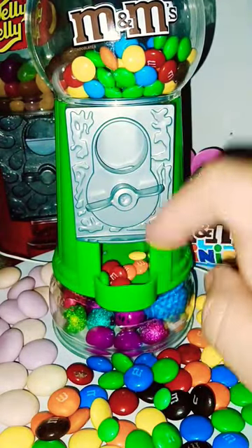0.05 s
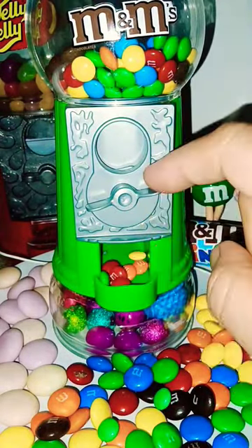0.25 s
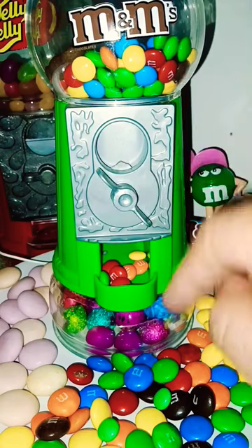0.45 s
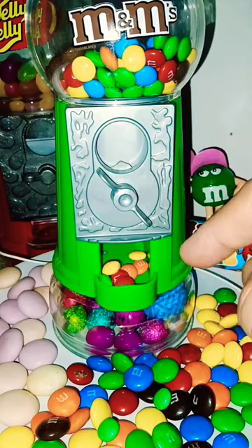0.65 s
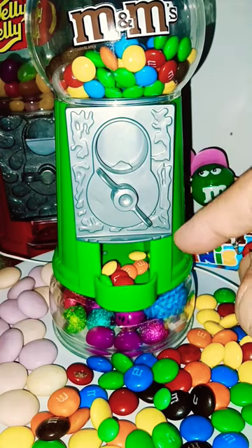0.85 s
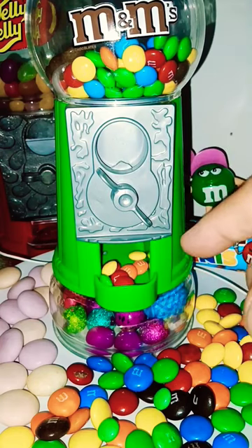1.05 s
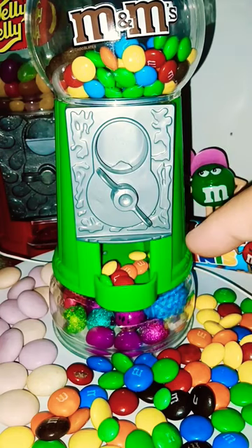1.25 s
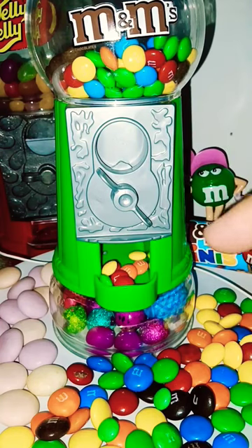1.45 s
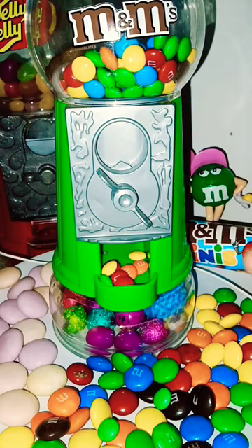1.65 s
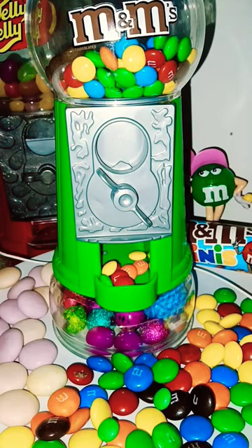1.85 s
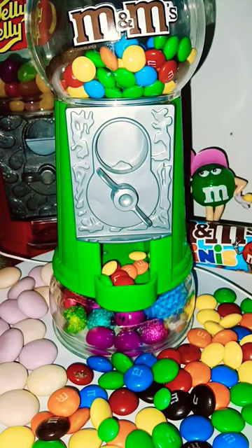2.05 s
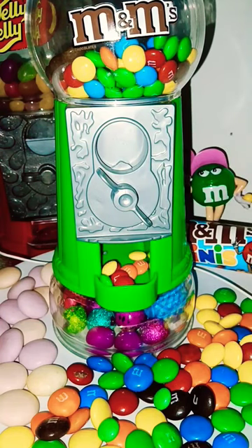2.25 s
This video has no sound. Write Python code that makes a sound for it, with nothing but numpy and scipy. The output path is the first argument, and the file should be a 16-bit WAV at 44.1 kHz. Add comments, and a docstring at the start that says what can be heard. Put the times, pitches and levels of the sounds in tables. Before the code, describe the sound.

A plastic candy dispenser's knob ratchets with sharp clicks and rattling sweets, then near quiet.

```python
"""Candy dispenser, one turn of the knob

The knob of a small plastic candy dispenser is turned close by, in a quiet room. The mechanism takes up
its slack and the pawl snaps over the ratchet, each snap a burst of chatter that rings the casing.
Sweets rattle inside, a spring rings thinly, and the body thuds and rocks under the hand.
Afterwards only mains hum, low room noise and two tiny ticks of settling sweets remain."""
import sys
import numpy as np
from scipy import signal
from scipy.fft import rfft, irfft
from scipy.io import wavfile
from scipy.ndimage import uniform_filter1d

SR = 44100
rng = np.random.default_rng(int(sys.argv[2]) if len(sys.argv) > 2 else 0)


def wrap_up_sound(samples):
    """Save the sound to the file named by the first command line argument, as 16-bit audio."""
    columns = np.atleast_2d(samples).T
    # keep every value between -1 and 1, then stretch to whole-number steps
    tamed = np.clip(columns, -1, 1)
    steps = np.round(tamed * 32767).astype(np.int16)
    wavfile.write(sys.argv[1], SR, steps)


N = 101429


def undb(db):
    """Decibels to gain."""
    return 10 ** (np.asarray(db) / 20)


def pan(db):
    """Left and right gains for a level difference, left minus right."""
    return undb(np.array([[db], [-db]]) / 2)


def add(out, at, sound):
    """Mix a stereo sound in at a time in seconds."""
    start = max(int(at * SR), 0)
    out[:, start:start + sound.shape[1]] += sound[:, :N - start]


def freqs(size=4096):
    """Frequencies of a spectrum, never quite zero."""
    return np.maximum(np.fft.rfftfreq(size, 1 / SR), 1)


def colour(hz, db, size=4096):
    """EQ curve through (Hz, dB) points on a log-frequency axis."""
    return undb(np.interp(np.log(freqs(size)), np.log(hz), db))


def response(gain):
    """Minimum-phase impulse response of an EQ curve."""
    cepstrum = irfft(np.log(gain + 1e-9))
    half = cepstrum.shape[-1] // 2
    cepstrum[..., 1:half] *= 2
    cepstrum[..., half + 1:] = 0
    return irfft(np.exp(rfft(cepstrum)))


def resonance(hz, width_hz):
    """EQ curve of one resonant peak."""
    return 1 / np.hypot(1, 2 * (freqs() - hz) / width_hz)


def lowpass(x, hz):
    """Gentle second-order treble roll-off."""
    return signal.sosfilt(signal.butter(2, hz, fs=SR, output="sos"), x)


def fade(t, t60):
    """Exponential decay by 60 dB in t60."""
    return np.exp(-np.log(1000) * t / t60)


def drift(per_s):
    """Slow random drift with a spread near 1."""
    points = rng.standard_normal(256)
    return np.interp(np.arange(N) / SR * per_s, np.arange(len(points)), points)


def chatter(ms, size=1024, passes=8):
    """One contact: a burst of micro-impacts that falls away after about ms; wide only in the treble."""
    rise_ms, mono_below_hz = .25, 2500
    age_ms = 1000 * np.arange(1, size + 1) / SR
    envelope = (1 - np.exp(-age_ms / rise_ms)) / (1 + (age_ms / ms) ** 3)
    width = 1 / np.hypot(1, (mono_below_hz / freqs(size)) ** 2)
    mid, side = rfft(rng.standard_normal((2, size)) * envelope)
    burst = irfft(mid + width * side * np.array([[1], [-1]]))
    for _ in range(passes):  # impose the envelope, then flatten the spectrum
        burst = burst * envelope / np.sqrt(uniform_filter1d(burst ** 2, size=24) + 1e-12)
        burst = irfft(np.exp(1j * np.angle(rfft(burst))))
    return burst * np.hanning(2 * size)[size:]


def mains_hum():
    """An appliance hums steadily, each partial wavering slightly in phase and level."""
    # partials of the hum: (frequency [Hz], level [dB])
    partials = [(199.2, -63), (258.4, -76), (301.5, -74), (398.4, -67.5), (500.6, -82), (597.5, -82.5),
                (699.8, -86.5), (802.1, -94.5), (899.0, -86.5)]
    waver_rad, waver_db = .15, .3
    t, hum = np.arange(N) / SR, 0
    for hz, db in partials:
        phase = 2 * np.pi * (hz * t + rng.random()) + waver_rad * drift(per_s=4)
        hum += np.sqrt(2) * undb(db + waver_db * drift(per_s=6)) * np.sin(phase)
    return hum * pan(db=1)


def room_tone():
    """A soft, wide bed of noise, heaviest in the bass."""
    # spectrum of the room noise: (frequency [Hz], relative level [dB])
    spectrum = [(10, -3.5), (30, 1.5), (60, -9.5), (105, -8), (160, -13.5), (280, -13.5), (550, -22.5),
                (1000, -25.5), (2500, -29), (6000, -34), (15000, -39)]
    hz, db = np.array(spectrum).T
    mid, side = irfft(rfft(rng.standard_normal((2, N))) * colour(hz, db, size=N), N)
    air = (mid + side * np.array([[1], [-1]])) / np.std(mid)
    return undb(-62) * air * pan(db=2.5)


def room(x):
    """Add diffuse reflections from near surfaces and the walls; the later, the duller."""
    # the table, a near wall, then the room: (delay [s], t60 [s], level [dB], pan [dB], low-pass [Hz])
    echoes = [(.003, .12, -9.5, 3.5, 12000), (.0115, .05, -13.5, -2.5, 9000), (.016, .22, -13.5, 1, 9000),
              (.025, .55, -24.5, 1, 6500)]
    t, tail = np.arange(SR) / SR, np.zeros((2, N))
    for delay, t60, db, pan_db, dull_hz in echoes:
        echo = rng.standard_normal((2, len(t))) * fade(t, t60)
        echo /= np.sqrt(np.sum(echo ** 2) / 2)
        add(tail, delay, undb(db) * pan(pan_db) * lowpass(echo, dull_hz))
    return x + signal.fftconvolve(x, tail, axes=1)[:, :N]


def rumble():
    """The dispenser rocks a little under the hand while the knob is forced round."""
    # envelope of the rocking: (time [s], level [dB])
    rocking = [(.17, -68), (.22, -53), (.28, -50.5), (.335, -58), (.375, -44), (.41, -53.5), (.47, -55)]
    times, db = np.array(rocking).T
    envelope = np.interp(np.arange(N) / SR, times, undb(db), left=0, right=0)
    noise = lowpass(rng.standard_normal(N), hz=41.4)
    return pan(db=8) * noise / np.std(noise) * envelope


def ticks():
    """Sweets settle, each with a tiny high tick."""
    # settling sweets: (time [s], level [dB])
    settles = [(1.9454, -31.5), (2.1048, -27)]
    out, ring = np.zeros((2, N)), response(resonance(hz=7500, width_hz=590))
    for at, db in settles:
        add(out, at, undb(db) * signal.fftconvolve(chatter(ms=2), ring[None], axes=1))
    return out


def thud():
    """The hardest snap jerks the whole dispenser on its base."""
    # low modes of the body: (frequency [Hz], t60 [s], level [dB])
    modes = [(45, .04, -32), (150, 0.02, -40.5), (431.2, 0.0195, -38)]
    t, out = np.arange(SR) / SR, np.zeros((2, N))
    body = sum(undb(db) * np.sin(2 * np.pi * hz * t) * fade(t, t60) for hz, t60, db in modes)
    add(out, at=.3563, sound=-pan(db=9) * body)
    return out


def spring():
    """Hard snaps jolt the return spring and linkage into a thin metallic ring."""
    # jolts of the spring: (time [s], level [dB])
    jolts = [(.2765, -9.5), (0.357, 2), (0.411, -1), (.510, -11)]
    # modes of spring and linkage: (frequency [Hz], t60 [s], level [dB], pan [dB])
    modes = [(2110, 0.24, -42, 2), (3600, 0.3, -43.5, 1), (4800, 0.16, -47.5, 3), (5425, 0.25, -40.5, 11.5),
             (5900, 0.272, -43, 12), (6255, .3, -41, 11.5), (6700, 0.2, -43, 6), (7248, .2, -41, 7),
             (7522, .25, -42.5, 10.5), (7930, .17, -33.5, 2.5), (8380, 0.12, -49, -2),
             (9616, 0.17, -40, -1)]
    t, out = np.arange(SR) / SR, np.zeros((2, N))
    attack = 1 - np.exp(-t / .0025)
    for at, jolt_db in jolts:
        for hz, t60, db, pan_db in modes:
            wave = np.sin(2 * np.pi * (hz * t + rng.random((2, 1))))
            add(out, at, undb(db + jolt_db) * pan(pan_db) * wave * fade(t, t60) * attack)
    return out


def casing(low_db, knock_db, middle_db, bright_db, air_db):
    """Stereo EQ curve of the plastic casing; where it is struck decides which modes speak."""
    # modes of the casing: (frequency [Hz], width [Hz], level [dB], pan [dB])
    modes = [(866, 1500, 0, 4.5), (1390, 215, 10, 4), (1864, 210, 13, 0.5), (2802, 540, 7, 3.5),
             (3794, 570, 11, -2), (4380, 380, 12, -1), (4690, 264, 9, 12.5), (5525, 320, 12.5, 10),
             (6202, 350, 17, 6), (7240, 410, 8.5, 18.5), (7620, 400, 13.5, 10.5), (8586, 725, 14.5, -1),
             (9516, 700, 13.5, -3.5), (10940, 700, 5.5, 0), (12340, 2100, 3.5, -0.5),
             (13360, 1100, 3, -0.5), (15000, 600, -4, -3)]
    # tone bands low, knock, middle, a 0 dB anchor, bright and air: (frequency [Hz])
    bands_hz = [800, 1900, 5400, 7600, 9600, 13000]
    skirt_slope, valley_db = 1.3, -10
    low_cut_hz, shelf_hz, shelf_db = 750, 10800, -6.5
    power = sum((undb(db) * pan(pan_db) * resonance(hz, width_hz) ** skirt_slope) ** 2
                for hz, width_hz, db, pan_db in modes)
    peaks = np.sqrt(power + undb(valley_db) ** 2)
    low_cut = 1 / np.hypot(1, (low_cut_hz / freqs()) ** 3)
    top_shelf = undb(shelf_db / (1 + (shelf_hz / freqs()) ** 20))
    tone = colour(bands_hz, [low_db, knock_db, middle_db, 0, bright_db, air_db])
    return peaks * low_cut * top_shelf * tone


def rattle():
    """Sweets and loose parts pepper the casing in short, dense flurries that die away."""
    # flurries: (start [s], length [s], release [s], level [dB], knock [dB], middle [dB], air [dB])
    flurries = [(0.193, .025, .008, -31, 7.5, -2, -6.5), (0.272, 0.002957, .002, -26, -1.5, 0, 0.5),
                (0.366, 0.066, .017, -24.5, -8.5, 0, 0.5), (0.504, .003, .002, -25.5, -4, 9, -2)]
    hits_per_s, attack_s, spread_db = 1400, .004, .5
    t, out = np.arange(N) / SR, np.zeros((2, N))
    for at, length, release, db, knock_db, middle_db, air_db in flurries:
        attack = np.clip((t - at) / attack_s, 0, 1)
        envelope = attack * np.exp(-np.maximum(t - at - length, 0) / release)
        struck = rng.random(N) < hits_per_s / SR
        hits = struck * undb(-spread_db * rng.standard_normal(N)) * rng.choice([-1, 1], N)
        tone = casing(low_db=-4.5, knock_db=knock_db, middle_db=middle_db, bright_db=-4, air_db=air_db)
        ring = signal.fftconvolve(chatter(ms=.86), response(tone), axes=1)
        out += undb(db) * signal.fftconvolve((hits * envelope)[None], ring, axes=1)[:, :N]
    return out * pan(db=-1.5)


def ratchet():
    """Each snap chatters briefly and rings the struck part and the casing; the contact adds a notch."""
    # snaps of the mechanism: (time [s], level [dB], chatter [ms], pan [dB],
    # struck part's pitch [Hz], its width [Hz], its boost [dB], antiresonance of the contact point [Hz],
    # low [dB], knock [dB], middle [dB], bright [dB], air [dB])
    snaps = [ (0.2048, -14, 1.8, 4, 6650, 400, 2, 2400, -1, -0.5, -5, -1.5, -5),
             (0.2083, -12, 3.2, 2, 1716, 230, 11.5, 1300, 8, 7, -0.5, 0, -6.5),
             (0.2192, -8, 3.4, -3.5, 5180, 199.5, 12.5, 4600, 0, 6, 0, -7.5, -14),
             (0.2218, -11.5, 3.4, 4.5, 950, 200, 7, 1300, 13, 6.5, 4.5, -1.5, -9),
             (0.2755, -1.5, 2.5, -1, 7950, 450, 8, 5300, -3, 3.5, -3.5, 3, -0.5),
             (0.356, -1, 2.4, 1, 5480, 450, 10.5, 6750, -10, -8.5, -2, 3.5, -0.5),
             (.4120, -7.5, 3.6, 2, 3583, 280, 14.5, 2950, -5.5, -3.5, 2.5, -3.5, -2.5),
             (0.4227, -10.5, 3.4, 5, 2060, 154.7, 5.5, 2900, -7.5, -2, 2, -14.5, -12),
             (0.4415, -9, 2, -1.5, 7300, 500, 2, 3000, -4.5, -4.5, 1, 0, -3.5),
             (0.5095, -4.5, 3.0, 1.5, 4600, 363, 3, 2600, -7.5, -5, 1, -3.5, -0.5)]
    notch_db, notch_width_hz = -9.5, 550
    out = np.zeros((2, N))
    for at, db, ms, pan_db, part_hz, part_width_hz, part_db, notch_hz, *tone in snaps:
        part = undb(part_db * resonance(part_hz, part_width_hz) ** 2)
        notch = undb(notch_db * resonance(notch_hz, notch_width_hz) ** 2)
        ring = response(casing(*tone) * part * notch)
        add(out, at, undb(db) * pan(pan_db) * signal.fftconvolve(chatter(ms), ring, axes=1))
    return out


def scene():
    """Snaps, rattles and ticks excite the room; spring, thud and rumble stay dry, over hum and noise."""
    dispenser = room(ratchet() + rattle() + ticks()) + spring() + thud()
    return undb(2) * dispenser + rumble() + mains_hum() + room_tone()


def record(dry):
    """A gain control ducks a little on loud peaks and recovers slowly; the very top is cut steeply."""
    duck_db, threshold_db, release_s, top_hz = -1, -25, .24, 15600
    leak = np.arange(N) / SR / release_s
    log_level = np.log(np.abs(dry).max(axis=0) + 1e-9)
    peak = np.exp(np.maximum.accumulate(log_level + leak) - leak)  # peak follower, exponential release
    duck = uniform_filter1d(np.tanh(peak / undb(threshold_db)), size=256)
    high_cut = signal.ellip(10, .2, 90, top_hz, fs=SR, output="sos")
    return signal.sosfilt(high_cut, dry * undb(duck_db * duck))


dry = scene()
out = record(dry)
wrap_up_sound(out)
```